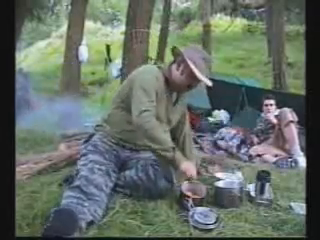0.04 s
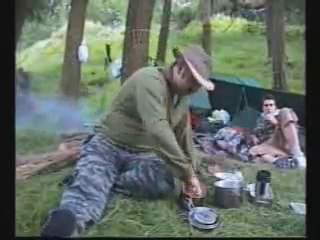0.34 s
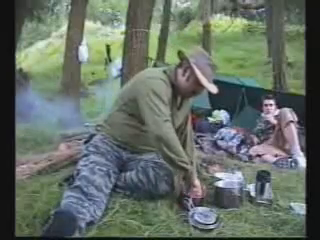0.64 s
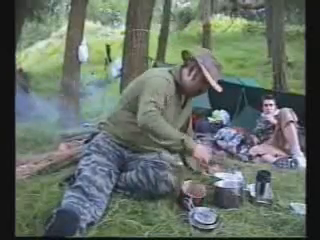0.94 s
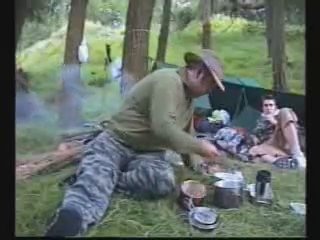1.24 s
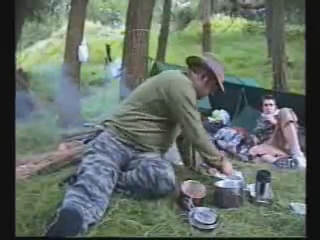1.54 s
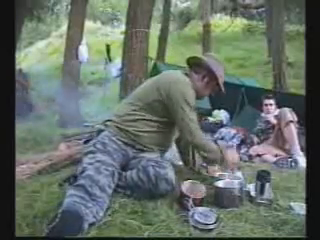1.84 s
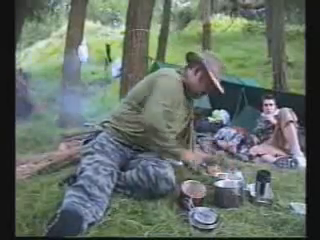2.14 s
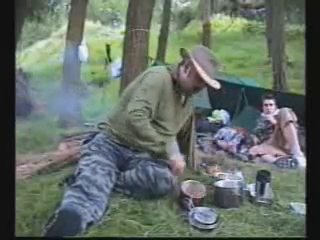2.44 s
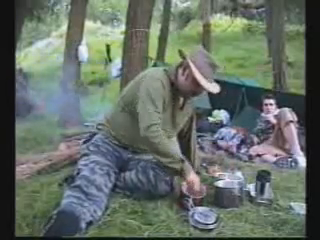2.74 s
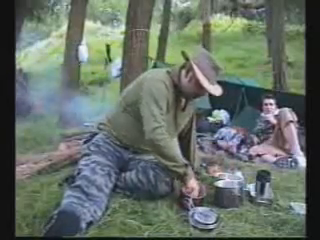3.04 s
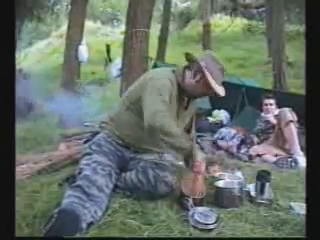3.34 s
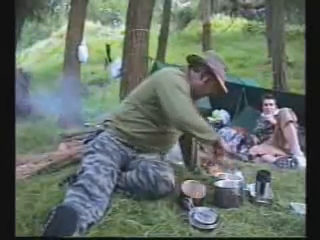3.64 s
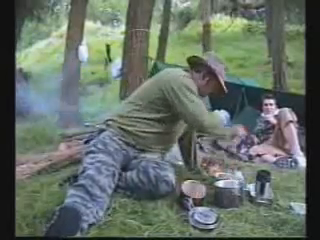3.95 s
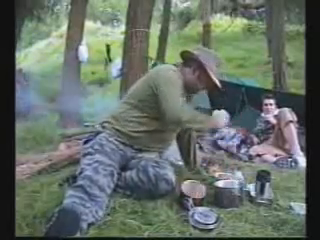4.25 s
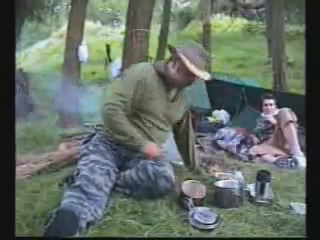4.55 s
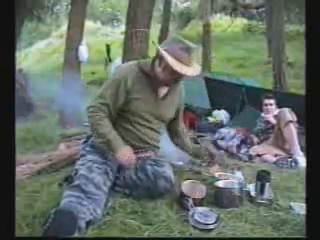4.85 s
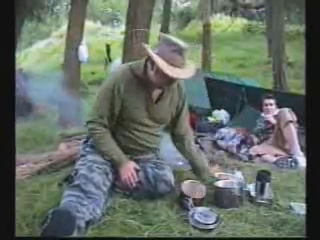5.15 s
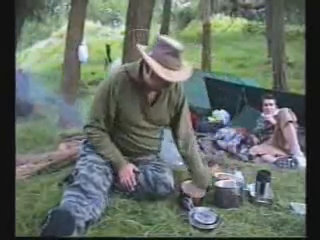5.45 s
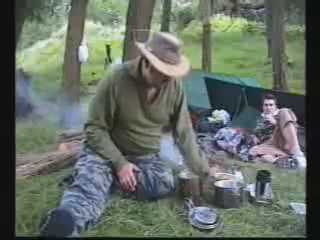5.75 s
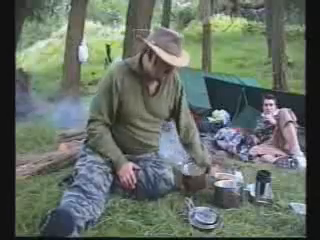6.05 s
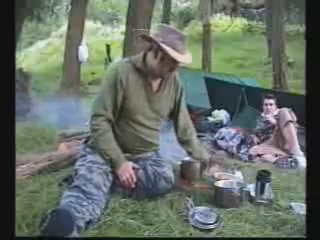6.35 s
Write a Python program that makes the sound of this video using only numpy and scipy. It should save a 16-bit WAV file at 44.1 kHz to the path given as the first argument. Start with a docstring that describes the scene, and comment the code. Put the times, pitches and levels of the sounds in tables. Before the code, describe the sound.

A soft, steady woodland hiss and a faint rustle of sleeves run throughout. From about 0.7 to 1.4 seconds a small tin chinks and a rim scrapes over a thin metal pot, with light, ringing clanks. At 1.9 seconds comes a dull wooden knock with a short echo from the trees. A hand rubs the pot faintly between 2.4 and 3.1 seconds, and the tin gives a tiny tick near 3.4. At 4 seconds a much louder, sharp wooden knock is followed by faint taps and twig ticks. The sleeves swell slightly around 4.6 seconds. From 5.6 to 6.6 seconds a pot is lifted and metal chatters on metal in a quick run of bright clanks and rattles, loudest near 6.1, 6.3 and 6.5 seconds, with soft thuds on the turf. The handling sounds nearby, in open air.

```python
"""A camper handles thin metal pots on grass. Woodland hiss and sleeve rustle run throughout.
0.7-1.4 s: a small tin chinks; a rim scrapes over a pot, tiny slips and light clanks ringing its modes.
1.9 s: a dull wooden knock, echoed by the trees. 2.4-3.1 s: a hand rubs the pot.
4.0 s: a louder knock, with faint taps and twig ticks around it.
5.6-6.6 s: he lifts the pot; metal chatters on metal, clanking and rattling, and thuds on the turf."""
import sys
import numpy as np
from scipy import signal
from scipy.io import wavfile

SR = 44100
rng = np.random.default_rng(int(sys.argv[2]) if len(sys.argv) > 2 else 0)


def log_audio(samples):
    """Write samples as a 16-bit WAV file to the path given in sys.argv[1]."""
    # one column per channel
    frames = np.atleast_2d(samples).T
    # limit to full scale, then quantise
    limited = np.clip(frames, -1, 1)
    pcm = np.round(limited * 32767).astype(np.int16)
    wavfile.write(sys.argv[1], SR, pcm)


N = 291545
TIME_S = np.arange(N) / SR
HIT_TIME_S = TIME_S[:SR // 3]

# woodland hiss (frequency [Hz], gain [dB])
AIR_EQ = [(15, -60), (25, -2), (54, -4), (120, 0), (208, -3), (291, -1.5), (600, -2), (817, 0.5), (1090, 0),
          (1410, -6.5), (1640, -9), (2300, -5), (2550, -8), (2880, -5), (3250, -8.5), (3750, -17),
          (5530, -12), (6500, -18), (12000, -19.5), (15600, -38), (22000, -120)]
# arm movements (start [s], length [s], level [dB])
ARM_REACHES = [(.62, 0.35, -54.5), (3.22, 0.2, -58), (4.6, 0.16, -50.5), (4.72, 0.2, -54), (5.1, 0.13, -55),
               (5.52, 0.79, -53.5), (5.95, 0.98, -50.5)]
# cloth friction (frequency [Hz], gain [dB])
CLOTH_EQ = [(150, -14), (500, 3), (1000, -2), (1650, 7.5), (2700, -3), (3900, 2.5), (5300, -1.5),
            (7300, -2), (9300, -9.5), (11500, -55)]

# touches on the tin (time [s], level [dB], chatter [s], favoured pitch [Hz], tick re ring [dB])
TIN_TOUCHES = [(0.681, -47, .006, 5233, 2), (0.7841, -40, 0.009, 5233, -9), (0.799, -47, 0.0029, 4000, -3),
               (.921, -43, 0.011, 4900, -14), (3.4177, -41, .003, 4000, 1)]
# tin resonances (frequency [Hz], level [dB], t60 [s])
TIN_MODES = [(1750, -16, .05), (3660, -9, .06), (3997, -3, .09), (4330, -11, .05), (4570, -9, .07),
             (4900, -8, .07), (5233, -7, .07), (5680, -10, .06), (6480, -12, .05), (7640, -13, .06),
             (8920, -9, .07), (10160, -13, .056)]
# tin contact tick (frequency [Hz], gain [dB])
TICK_EQ = [(300, -8), (1400, 6), (2800, -7), (5500, 1.5), (9500, -4), (11500, -16)]

# decay among the trunks (frequency [Hz], t60 [s])
TREE_DECAY = [(200, 0.8), (600, 0.54), (1400, 0.43), (4000, 0.13), (10000, 0.29)]
# scatter off the trunks (frequency [Hz], gain [dB])
TREE_EQ = [(150, -22.5), (450, -19), (900, -14.5), (1500, -19), (4000, -13), (10000, -15)]

# rim pushed over the pot (start [s], length [s], level [dB], favoured pitch [Hz])
RIM_PUSHES = [(0.907, 0.15, -41, 4020), (1.017, 0.18, -38.5, 6100), (1.133, 0.2, -42, 6600),
              (1.222, 0.097, -39, 4500), (1.273, 0.12, -39.5, 5850)]
# pot resonances (frequency [Hz], struck at base [dB], struck at rim [dB], unheld t60 [s])
POT_MODES = [(560, -16.5, -17, .12), (668, -15, -12, .085), (1010, -23, -21, .23), (1410, -15, -22, .06),
             (1730, -16, -15, .21), (1850, -22, -6, .06), (2400, -18, -24, .05), (3662, -1.5, -12, .062),
             (3840, -7, -12, .045), (3992, -11, -5, .068), (4380, -12, -12, .07), (4550, -10, -11, .06),
             (5020, -11, -7, .06), (5240, -12, -9, .06), (5875, -5.5, -9, .05), (6140, -5, -9, .055),
             (6590, -11, -8, .05), (6950, -15, -19, .04), (7240, -11, -13, .05), (8230, -14, -17, .05),
             (8430, -8, -16, .07), (8650, -12, -16, .05), (9420, -18, -15, .05), (10250, -22, -19, .05)]
# scrape: rasp and ring (frequency [Hz], gain [dB])
RASP_EQ = [(150, -19), (420, -9), (650, 6), (1050, 4), (1270, -3), (1500, 9), (1780, 13.5), (2100, -24),
           (3000, -7), (3800, -10), (6000, 2), (7300, -7), (8100, -6), (10200, -21), (12000, -26)]
SCRAPE_RING_EQ = [(500, -4), (1000, 9.5), (1400, 7), (1750, 6.5), (2400, 8), (4000, .5), (4500, -4),
                  (5000, 1), (5400, -7), (6000, 0), (7300, 3), (8300, 2), (9500, 5.5)]
# blows on the pot (time [s], level [dB], chatter [s], tilt [dB/octave], place [0 base, 1 rim],
# body ring [dB], favoured pitch 1 [Hz], favoured pitch 2 [Hz])
POT_BLOWS = [(0.979, -34.5, 0.0037, -6, 0.44, 9, 4030, 5040), (1.068, -39, 0.0032, 2, 0.13, -4, 6100, 7240),
             (1.081, -39, 0.0012, 4, 0.38, -5, 5900, 6900), (1.105, -37, 0.0034, 7, 0.56, -15, 6600, 3900),
             (1.126, -35.5, 0.0067, 7, 1, 7, 7300, 5850), (1.2243, -37, 0.0017, 4, 0.13, -15, 5700, 4500),
             (1.2443, -44, .004, 2, 1, -21, 5020, 3900), (1.259, -41, 0.0036, -5, 0.91, -4, 4500, 5880),
             (1.313, -41, 0.0033, -5, .5, -4, 6100, 4400), (1.37, -45.5, .002, -4, .5, -2, 5900, 3900),
             (5.568, -41.5, 0.017, -9, 0.049, 3, 3940, 6100),
             (5.618, -40.5, 0.013, -4, 0.45, -3, 3960, 6000),
             (5.705, -36.5, 0.0023, 0.5, 0.95, 0, 3800, 6300),
             (5.857, -28.5, 0.0094, -7, 0.76, 7.5, 4040, 4550),
             (5.8957, -23.5, 0.0042, -1.5, 0.54, 8, 4070, 6180),
             (5.9683, -31.5, 0.0061, -5, 0.68, -2, 4380, 6560),
             (6.004, -36.5, 0.028, 3, 0.47, 0, 5020, 6100),
             (6.027, -29.5, 0.0044, -1.5, 0.56, -2, 6590, 6160),
             (6.07, -14.5, 0.0048, -4.5, 0, 6, 5870, 8430), (6.085, -30, 0.0051, 9, 0.46, 0, 6590, 8430),
             (6.096, -33, 0.0018, 4, 0.27, 7, 5850, 5020), (6.1044, -14, 0.0067, 0, 0.42, -6, 3960, 5880),
             (6.1457, -20, 0.0088, 1.5, 0.32, 8.5, 7200, 8430),
             (6.212, -40.5, 0.011, 1, 0.29, -9, 3730, 6100),
             (6.2796, -27.5, 0.0054, -7, 0.43, 4, 3920, 6150),
             (6.3171, -33, 0.0013, -2, 0.96, 0, 4970, 6590), (6.331, -37, 0.0038, -2, 0.88, 0, 4550, 5880),
             (6.3372, -14.5, 0.0047, -4.5, 0, 3.5, 6200, 8430),
             (6.355, -22, 0.011, -5, 0.92, -3, 4570, 6000),
             (6.364, -21, 0.0031, -3.5, 0.15, 1.5, 3680, 6570),
             (6.377, -26.5, 0.0077, -1, 0.4, 1, 8430, 4550), (6.417, -38.5, 0.005, 2, 0.17, 0, 3700, 5020),
             (6.4371, -38, 0.0048, -6, 0.58, 2, 5800, 3950),
             (6.4903, -11.5, 0.0059, -2.5, 0.08, 7, 3690, 7240),
             (6.507, -26, 0.0034, 2, .35, -4, 5020, 5850), (6.547, -38.5, 0.0037, -6, 0.2, -1, 3960, 5850),
             (6.5784, -44.5, 0.0054, -3, 0.85, -6, 5030, 4000)]
# crowd of weak pot modes (frequency [Hz], gain [dB])
CLATTER_EQ = [(150, -20.5), (560, 1.5), (900, -8.5), (1600, -4.5), (2300, -6.5), (2900, -13), (3350, -19),
              (3700, -2), (5300, -3.5), (5950, 5), (7800, -5), (8550, -0.5), (9700, -5.5), (10800, -55),
              (12500, -45)]
# gap between wall and rim modes (frequency [Hz], gain [dB])
MODE_GAP_EQ = [(2200, 1), (2500, 0.5), (3000, -1.5), (3400, -6.5), (3620, 0.5)]

# blows on wood (time [s], level [dB], echo delay [s], echo gain [dB], favoured pitch [Hz])
WOOD_BLOWS = [(1.81, -48, .025, -16, 1400), (1.8874, -27, .0235, -5, 2040), (3.65, -51, .038, -22, 1450),
              (4.0188, -15.5, 0.019, -4, 1220), (4.077, -45, 0.0093, -3, 1400),
              (4.121, -43.5, .02, -9, 1300), (4.182, -46, 0.028, -12, 535)]
# wood resonances (frequency [Hz], level [dB], t60 [s])
WOOD_MODES = [(225, -10, 0.022), (440, -2, 0.06), (530, -1.5, 0.045), (800, -5.5, 0.03), (915, -9, .03),
              (1187, -12, 0.042), (1398, -1.5, 0.06), (1447, -1, 0.05), (1610, -14, .025),
              (2040, -16.5, 0.05), (2720, -21, 0.04), (3600, -12, .06), (4560, -12, 0.04),
              (5450, -11, .025), (5950, -8.5, 0.03), (7550, -10.5, 0.025)]
# knock: crack, direct sound, echo (frequency [Hz], gain [dB])
CRACK_EQ = [(60, -16), (180, 0), (400, 3.5), (1400, 8), (1900, -8.5), (2500, -5.5), (4500, 2), (6100, -9),
            (8300, -21), (9600, 1), (10700, -12)]
KNOCK_EQ = [(70, -2), (130, 0), (230, 4), (350, 1.5), (480, 2.5), (7000, 1.5), (9700, -3), (11000, -51)]
ECHO_EQ = [(70, -45), (200, -12.5), (480, -12), (950, -14.5), (1400, -17), (1750, -19.5),
           (5500, -20.5), (10000, -42)]

# hand strokes on the pot (start [s], length [s], level [dB])
HAND_RUBS = [(2.37, 0.15, -48.5), (2.47, 0.12, -46.5), (2.865, 0.21, -44.5)]
# held-pot resonances (frequency [Hz], level [dB], t60 [s])
HELD_POT_MODES = [(1420, -3, .012), (1700, 0, .014), (2050, -7, .01), (3680, -5, .014), (4100, -8, .012)]
# hand friction (frequency [Hz], gain [dB])
RUB_EQ = [(150, -12), (500, 4), (1000, 2), (1700, 5), (2700, 0), (4000, 2), (5500, -.5), (7500, -.5),
          (9300, -3), (11500, -45)]

# twig snaps (time [s], level [dB])
TWIG_SNAPS = [(4.058, -38), (4.121, -43), (4.183, -46.5), (4.23, -48), (4.802, -45.5), (3.332, -48)]
# twig and litter (frequency [Hz], gain [dB])
TWIG_EQ = [(200, -3), (1200, 3.5), (2800, -3), (5000, 3), (10000, -18)]
# pot landings (time [s], level [dB])
LANDINGS = [(6.07, -36.5), (6.1056, -43), (6.1453, -47), (6.338, -39.5), (6.4903, -29)]
# puff of a landing (frequency [Hz], gain [dB])
PUFF_EQ = [(30, 6), (120, -5), (210, -5), (380, -26), (2000, -55)]


def amp(db):
    """dB to gain."""
    return 10 ** (np.asarray(db) / 20)


def unit_rms(x):
    """Scale to rms 1."""
    return x / np.sqrt(np.mean(x ** 2) + 1e-20)


def unit_hit(x):
    """Scale to the energy of 10 ms at rms 1."""
    return x / np.sqrt(np.sum(x ** 2) / (SR / 100) + 1e-20)


def lookup(points, hz):
    """Interpolate over log frequency."""
    points_hz, values = np.transpose(points)
    return np.interp(np.log(hz + 1), np.log(points_hz), values)


def add(mix, start_s, sound):
    """Mix in at start_s."""
    part = mix[round(start_s * SR):][:len(sound)]
    part += sound[:len(part)]


def colour(x, eq, order=2048):
    """Minimum-phase equaliser."""
    log_gain = np.log(amp(lookup(eq, abs(np.fft.fftfreq(order, 1 / SR)))))
    taps = np.fft.ifft(np.exp(np.conj(signal.hilbert(log_gain)))).real
    return signal.oaconvolve(x, taps)[:len(x)]


def mode(force, hz, t60_s):
    """One driven, damped resonance."""
    pole = amp(-60 / (t60_s * SR)) * np.exp(2j * np.pi * hz / SR)
    return signal.lfilter([1], [1, -pole], force).real


def burst(hold_s, t60_s, rise_s=0.00019):
    """Dense micro-contacts: noise that rises, holds, decays."""
    envelope = (1 - np.exp(-HIT_TIME_S / rise_s)) * amp(-60 * np.maximum(HIT_TIME_S - hold_s, 0) / t60_s)
    return envelope * rng.standard_normal(len(HIT_TIME_S))


def drift(knots_per_s):
    """Random piecewise-linear curve, rms 1."""
    knots_s = np.arange(0, TIME_S[-1] + 1, 1 / knots_per_s)
    return unit_rms(np.interp(TIME_S, knots_s, rng.standard_normal(len(knots_s))))


def strokes(rows, peak_share=0.2, roundness=1.2):
    """Friction gain: each stroke speeds up, peaks, stops. Low roundness = flat top."""
    power = np.zeros(N)
    for start_s, length_s, db in rows:
        progress = np.interp((TIME_S - start_s) / length_s, [0, peak_share, 1], [0, .5, 1])
        power += (amp(db) * abs(np.sin(np.pi * progress)) ** roundness) ** 2
    return np.sqrt(power)


def favour_db(hz, favoured_hz, peak_db=7.5, width_hz=170):
    """Boost for the modes that swing most at the contact point."""
    return peak_db * np.max([np.exp(-((hz - f) / width_hz) ** 2) for f in favoured_hz], 0)


def ground_bounce(x, delay_s, gain):
    """Direct sound plus ground reflection: a comb filter."""
    time_s = TIME_S[:len(x)]
    return x + gain * np.interp(time_s - delay_s, time_s, x, left=0)


def air(level_db=-50.5, waver_db=0.65):
    """Soft, steady hiss of open woodland."""
    return amp(level_db + waver_db * drift(5.41)) * unit_rms(colour(rng.standard_normal(N), AIR_EQ))


def sleeves(grain_db=1.0, fidget_db=-57.5, waver_db=2.5):
    """Cloth slides on cloth, fibres catching unevenly; swells with each reach, never quite still."""
    fibres = rng.standard_normal(N) * amp(grain_db * drift(270))
    fidget = amp(fidget_db + waver_db * drift(9))
    return unit_rms(colour(fibres, CLOTH_EQ)) * np.hypot(strokes(ARM_REACHES), fidget)


def chink(level_db, chatter_s, favoured_hz, tick_db):
    """Light touch on a small tin: contact tick plus clear pings."""
    force = burst(chatter_s, 0.006)
    ring = sum(amp(db + favour_db(hz, [favoured_hz])) * unit_hit(mode(force, hz, t60_s))
               for hz, db, t60_s in TIN_MODES)
    tick = colour(burst(chatter_s, 0.051), TICK_EQ)
    return amp(level_db) * unit_hit(unit_hit(ring) + amp(tick_db) * unit_hit(tick))


def tree_scatter(x, onset_s=0.0057):
    """Trunks scatter a faint tail; treble dies first."""
    hz, time_s, spectrum = signal.stft(rng.standard_normal(SR * 3 // 4), SR, nperseg=256)
    decay = amp(-60 * time_s / lookup(TREE_DECAY, hz)[:, None])
    tail = signal.istft(spectrum * decay, SR, nperseg=256)[1]
    tail *= np.minimum(TIME_S[:len(tail)] / onset_s, 1)
    return colour(signal.oaconvolve(x, tail / np.linalg.norm(tail))[:N], TREE_EQ)


def scrape(slips_per_s=1600, grit_db=2.2, wander_db=4.5, ring_db=4.5, t60_scale=0.65):
    """Rim drags over the pot: slips rasp and drive hand-damped modes, different ones per push."""
    slipping = rng.random(N) < slips_per_s / SR
    slip_db = 2 * np.minimum(rng.exponential(1, N), 3)
    slips = slipping * amp(slip_db) * rng.choice([-1, 1], N)
    force = (unit_rms(slips) + .25 * rng.standard_normal(N)) * amp(grit_db * drift(160))
    peak_share = 0.31
    peaks_s = [start_s + peak_share * length_s for start_s, length_s, _, _ in RIM_PUSHES]
    ring = 0
    for hz, _, rim_db, t60_s in POT_MODES:
        boost_db = np.interp(TIME_S, peaks_s, [favour_db(hz, push[-1:]) for push in RIM_PUSHES])
        gain = amp(rim_db / 2 + boost_db + wander_db * drift(25.06))
        ring += gain * unit_rms(mode(force, hz, t60_scale * t60_s))
    ring = colour(ring, SCRAPE_RING_EQ)
    rasp = ground_bounce(colour(force, RASP_EQ), delay_s=.00098 + .00004 * drift(7), gain=.5)
    envelope = strokes([push[:-1] for push in RIM_PUSHES], peak_share, roundness=0.84)
    return envelope * unit_rms(unit_rms(rasp) + amp(ring_db) * unit_rms(ring))


def clank(level_db, chatter_s, tilt_db, place, body_db, *favoured_hz, spread_db=2, detune=.004):
    """Metal chatters on metal: the contact point selects modes, the grip detunes them slightly."""
    t60_scale = np.interp(level_db, [-38, -16], [.92, .72])  # hard blows press the parts together
    force = burst(chatter_s, 0.0041)
    ring = 0
    for hz, base_db, rim_db, t60_s in POT_MODES:
        level_draw, pitch_draw = rng.standard_normal(2)
        boost_db = body_db if hz < 2000 else favour_db(hz, favoured_hz)
        db = np.interp(place, [0, 1], [base_db, rim_db]) + boost_db + spread_db * level_draw
        ring += amp(db) * unit_hit(mode(force, hz * (1 + detune * pitch_draw), t60_scale * t60_s))
    clatter = colour(burst(chatter_s, t60_scale * 0.068), CLATTER_EQ)
    clatter = ground_bounce(clatter, delay_s=rng.uniform(0.000785, 0.0017), gain=0.2)
    metal = unit_hit(ring) + amp(-2 - 6 * place) * unit_hit(clatter)  # rim rings cleaner than base
    # soft blows boom more for their level, the stiff rim less
    hard_blow_db = -16.5
    boom_db = -1 + 0.58 * (hard_blow_db - level_db) - 11 * place ** 4
    metal = colour(metal, [(1900, boom_db), (3000, -tilt_db), (6000, 0), (12000, tilt_db)])
    return amp(level_db) * unit_hit(colour(metal, MODE_GAP_EQ))


def wood_ring(force, favoured_hz, detune=.004):
    """Short wood modes, weighted by the struck spot."""
    shifts = 1 + detune * rng.standard_normal(len(WOOD_MODES))
    return unit_hit(sum(amp(db + favour_db(hz, [favoured_hz])) * unit_hit(mode(force, hz * shift, t60_s))
                        for (hz, db, t60_s), shift in zip(WOOD_MODES, shifts)))


def knock(level_db, delay_s, echo_db, favoured_hz, crack_db=-6, scatter_db=-4):
    """Blow on wood: crack and ring, then a duller, smeared echo off the nearest trunks."""
    ring = wood_ring(burst(0.00067, 0.013, rise_s=0.00048), favoured_hz)
    crack = unit_hit(colour(burst(0.0041, 0.052, rise_s=0.00056), CRACK_EQ))
    blow = unit_hit(colour(ring + amp(crack_db) * crack, KNOCK_EQ))
    echo_ring = wood_ring(burst(0.0062, 0.0049, rise_s=0.00068), favoured_hz)
    scatter = unit_hit(colour(burst(0.012, 0.065, rise_s=0.0024), CRACK_EQ))
    echo = unit_hit(colour(echo_ring + amp(scatter_db) * scatter, ECHO_EQ))
    add(blow, delay_s, amp(echo_db) * echo)
    return amp(level_db) * blow


def hand_rub(grain_db=1.5, body_db=-4):
    """Hand slides over the held pot: rustle plus a hollow, damped body."""
    force = rng.standard_normal(N) * amp(grain_db * drift(200))
    body = sum(amp(db) * unit_rms(mode(force, hz, t60_s)) for hz, db, t60_s in HELD_POT_MODES)
    rustle = colour(force, RUB_EQ)
    return unit_rms(unit_rms(rustle) + amp(body_db) * unit_rms(body)) * strokes(HAND_RUBS)


def twig(level_db):
    """Dry twig: sharp snap, short rustle of litter."""
    litter = unit_hit(burst(.0022, 0.25))
    snap = unit_hit(burst(0.00079, 0.0047))
    return amp(level_db) * unit_hit(colour(litter + snap, TWIG_EQ))


def thud(level_db, puff_db=-3):
    """Pot lands on turf: low push, dull puff."""
    force = HIT_TIME_S * np.exp(-HIT_TIME_S / .0007)
    push = mode(force, hz=110, t60_s=0.022)
    puff = colour(burst(0.0011, 0.048), PUFF_EQ)
    return amp(level_db) * unit_hit(unit_hit(push) + amp(puff_db) * unit_hit(puff))


def scene():
    """Scrape and hits with tree scatter; sleeves, hand and air added dry. Mono."""
    near = scrape()
    for source, events in [(clank, POT_BLOWS), (thud, LANDINGS), (chink, TIN_TOUCHES),
                           (knock, WOOD_BLOWS), (twig, TWIG_SNAPS)]:
        for start_s, *settings in events:
            add(near, start_s, source(*settings))
    return (near + tree_scatter(near) + sleeves() + hand_rub() + air())[None]


def record(dry):
    """Soft clip, treble cut, low-pass."""
    ceiling, cutoff_hz = .8, 12000
    rounded = ceiling * np.tanh(dry[0] / ceiling)
    dulled = colour(rounded, [(10300, -1.5), (11000, -8.5)])
    lowpass = signal.firwin(511, cutoff_hz, window=("kaiser", 9), fs=SR)
    return signal.oaconvolve(dulled, lowpass, "same")[None]


dry = scene()
out = record(dry)
log_audio(out)
```